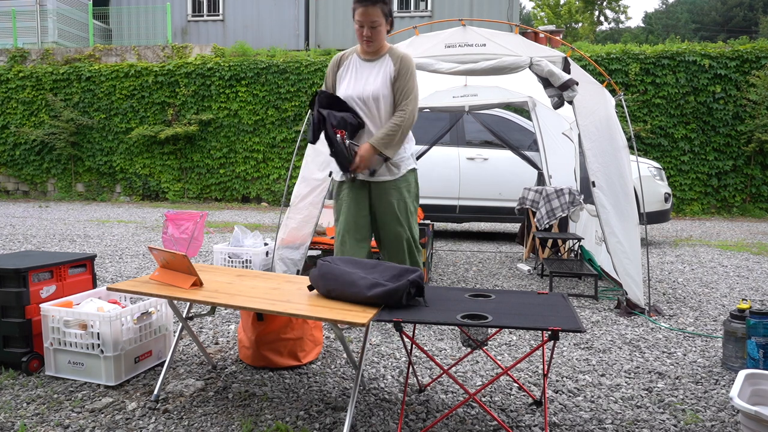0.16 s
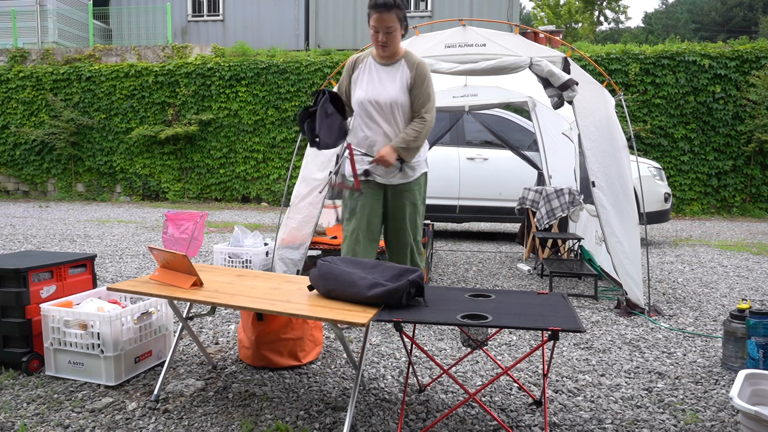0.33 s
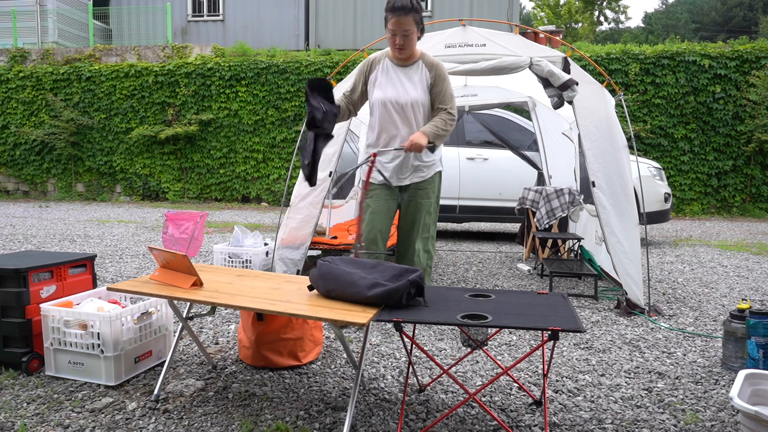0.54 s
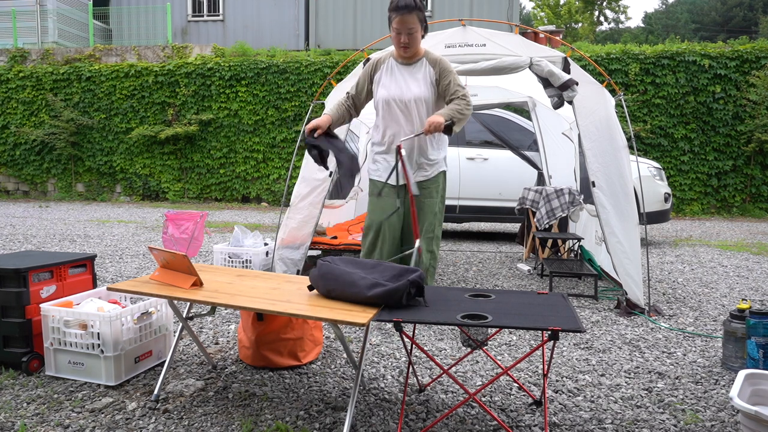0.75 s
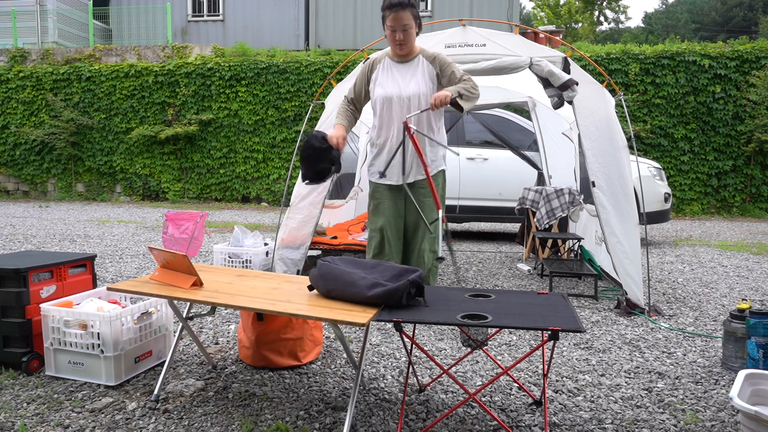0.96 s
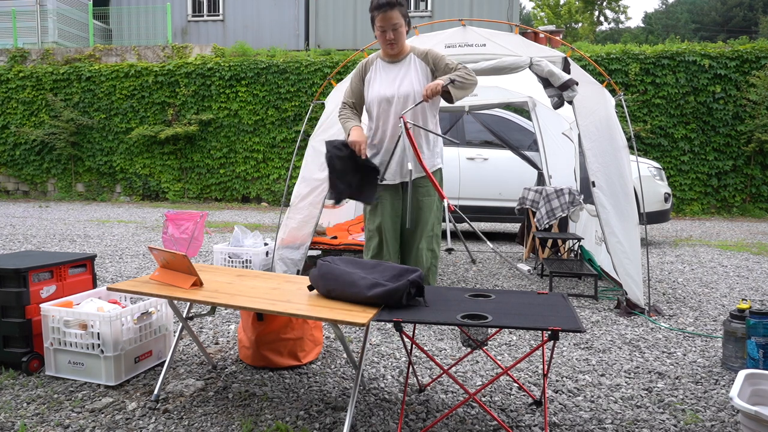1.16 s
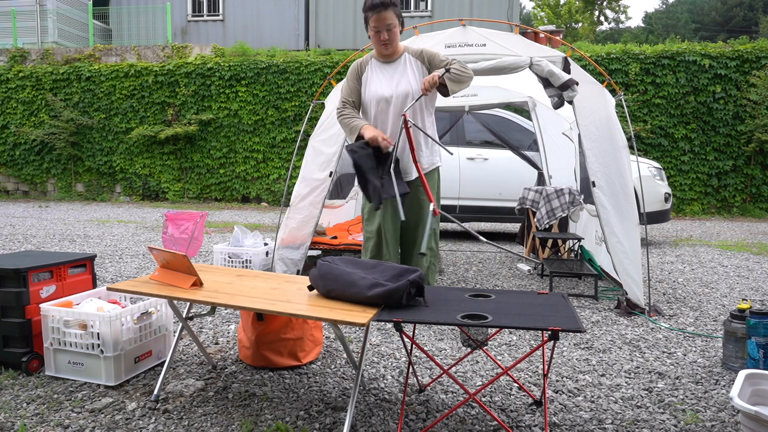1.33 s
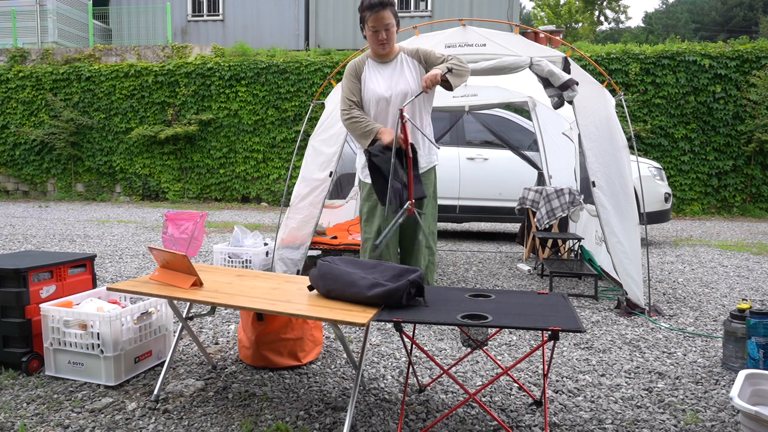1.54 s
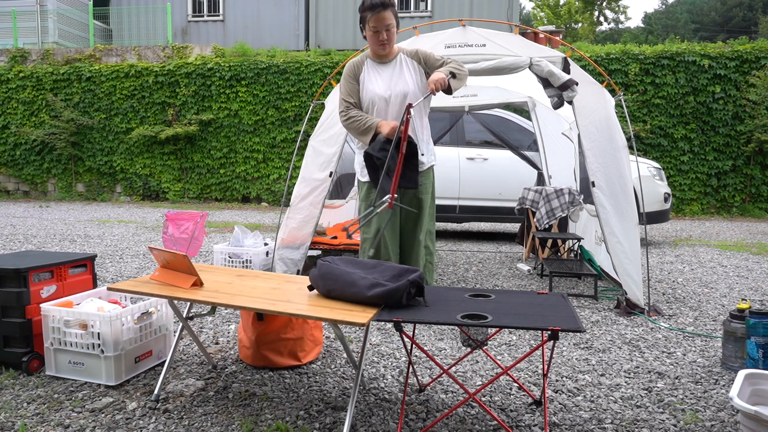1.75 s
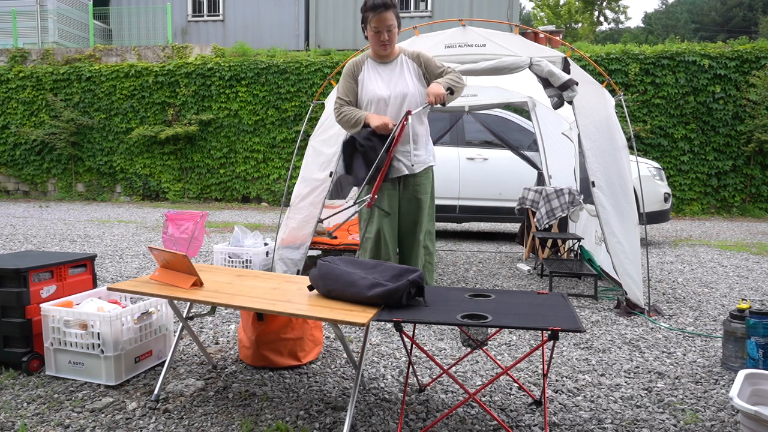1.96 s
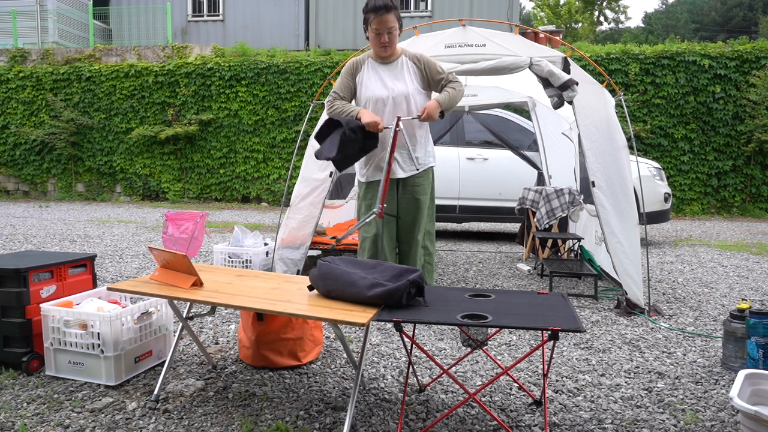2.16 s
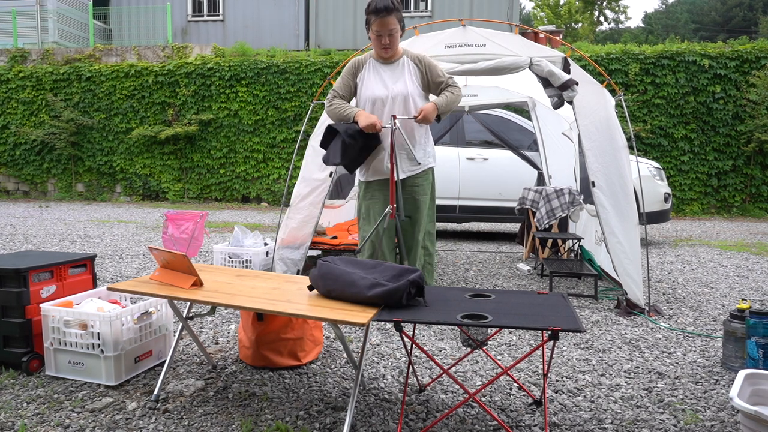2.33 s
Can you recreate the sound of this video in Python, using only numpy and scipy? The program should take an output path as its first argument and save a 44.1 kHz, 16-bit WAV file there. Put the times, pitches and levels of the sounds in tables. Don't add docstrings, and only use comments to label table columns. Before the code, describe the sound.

Thin metal tubes of a folding stand rattle out of a cloth bag and snap together outdoors

```python
import sys
import numpy as np
from scipy import signal
from scipy.fft import rfft, irfft
from scipy.io import wavfile
from scipy.ndimage import uniform_filter1d

SR = 44100
rng = np.random.default_rng(int(sys.argv[2]) if len(sys.argv) > 2 else 0)


def invert_db(level):
    return 10 ** (np.asarray(level, dtype=float) / 20)


def wav_out(sig):
    wavfile.write(sys.argv[1], SR, np.round(np.clip(np.atleast_2d(sig).T, -1, 1) * 32767).astype(np.int16))


N = 105840


def evened(x):
    return x / np.sqrt(np.mean(x ** 2) + 1e-20)


def read(points, hz):
    f, value = np.transpose(points)
    return np.interp(np.log(hz + 1), np.log(f + 1), value)


def add(mix, start_s, sound):
    part = mix[:, round(start_s * SR):][:, :sound.shape[1]]
    part += sound[:, :part.shape[1]]


def panned(pan_db):
    return invert_db(np.array([[pan_db / 2], [-pan_db / 2]]))


def colour(db):
    log = np.log(invert_db(np.maximum(np.r_[db, db[-2:0:-1]], -100)))
    return np.fft.ifft(np.exp(log - 1j * signal.hilbert(log).imag)).real[:512]


def grains(shape, per_s, spread_db):
    hits = rng.standard_normal(shape) * (rng.random(shape) < per_s / SR)
    hits *= invert_db(spread_db * np.minimum(rng.exponential(1, shape), 4))
    same = 0.8
    right = same * hits[0] + np.sqrt(1 - same ** 2) * hits[1]
    return evened(np.array([hits[0], right]))


def wash():
    # pitch_hz, density_db
    road = [(12, -88), (20, -43), (319, -15.5), (513, -10), (802, -3.5), (1760, -10), (3530, -21),
            (3840, -17.5), (12000, -23.5), (16000, -32)]
    # pitch_hz, likeness (0-1)
    likeness = [(30, .6), (100, .88), (300, .85), (950, .5), (4000, .1)]
    level_db, patch_db = -50, 1.86
    frames, hz = N // 256 + 5, np.fft.rfftfreq(1024, 1 / SR)
    a, b, c, d, patches = rng.standard_normal((frames, 513, 5)).T
    patches = evened(uniform_filter1d(uniform_filter1d(patches, 12, 0), 12, 1))
    same = np.clip(read(likeness, hz), -1, 1)[:, None]
    left = a + 1j * b
    right = same * left + np.sqrt(1 - same ** 2) * (c + 1j * d)
    z = np.array([left, right]) * invert_db(read(road, hz)[:, None] + patch_db * patches)
    return invert_db(level_db) * evened(signal.istft(z, nperseg=1024, noverlap=768)[1][:, :N])


def bird():
    # time_s, pitch_hz, level_db
    whistle = [
        (2.22, 3350, -70),
        (2.26, 3440, -65),
        (2.3, 3490, -72),
        (2.33, 3540, -67),
        (2.355, 3600, -55),
        (2.385, 3600, -57),
    ]
    (s, hz, db), t = np.transpose(whistle), np.arange(N) / SR
    flutter = 1 + .6 * evened(uniform_filter1d(rng.standard_normal(N), 300))
    phase = 2 * np.pi * np.cumsum(np.interp(t, s, hz)) / SR
    return flutter * invert_db(np.interp(t, s, db + 0.5, -140, -140)) * np.sin(phase)


def yard(x):
    # pitch_hz, t60_s
    decay = [(1000, 0.061), (5000, 0.13), (15000, 0.23)]
    shared = 0.31
    taps = rng.standard_normal((2, 16384)) + shared * rng.standard_normal(16384)
    taps[:, :180] = 0
    hz, t, z = signal.stft(taps, SR, nperseg=128)
    tail = signal.istft(z * invert_db(-60 * t / read(decay, hz)[:, None]), SR, nperseg=128)[1]
    return signal.fftconvolve(x, tail / np.linalg.norm(tail[0]), axes=1)[:, :N]


def cloth():
    # start_s, length_s, level_db, brightness_db_per_octave
    strokes = [(-.04, .11, -44.5, 2), (0.088, 0.23, -39.5, 0.5), (0.301, 0.17, -37.5, 2),
               (0.648, 0.21, -41, 3), (0.809, 0.12, -43, 3), (1.056, 0.089, -47, 0.5),
               (1.361, 0.15, -49.5, 0), (1.551, 0.056, -37.5, 0.5), (1.628, 0.094, -42, 4.5),
               (1.667, 0.069, -46, -0.5), (1.712, 0.047, -43, 0.5), (1.759, 0.054, -50, 11),
               (1.845, 0.032, -53, -5), (1.86, 0.082, -49, -1), (1.923, 0.058, -51, -2),
               (2.011, 0.033, -55, 2), (2.158, 0.03, -54.5, 8), (2.288, 0.24, -59, -2.5)]
    # pitch_hz, density_db
    fabric = [(300, -46), (700, -8.5), (1800, 1.5), (5600, -4.5), (12000, -11.5), (16000, -25)]
    per_s, spread_db, trim_db, pan_db = 4500, 3.0, -1.5, -3
    out, hz, t = np.zeros((2, N)), np.fft.rfftfreq(1024, 1 / SR), np.arange(N) / SR
    fizz = grains((2, N), per_s, spread_db) * panned(pan_db)
    for s, length, db, tilt_db in strokes:
        now = (t > s) & (t < s + length)
        weave = colour(read(fabric, hz) + tilt_db * np.log2((hz + 200) / 4000))
        stroke = fizz[:, now] * np.sin(np.pi * (t[now] - s) / length) ** 0.9
        rustle = signal.fftconvolve(stroke, weave[None] / np.linalg.norm(weave), axes=1)
        add(out, max(s, 0), invert_db(db + trim_db) * rustle)
    return out


def hand_thuds():
    # start_s, level_db, pitch_hz
    thuds = [
        (0.505, -30, 572),
        (0.563, -33, 385),
        (0.803, -25.5, 933),
        (1.029, -25.5, 974),
    ]
    t60_s, rise_s = 0.017, 0.0021
    out, t = np.zeros((2, N)), np.arange(4000) / SR
    for s, db, hz in thuds:
        thud = invert_db(db - 60 * t / t60_s) * np.sin(2 * np.pi * hz * t) * np.minimum(t / rise_s, 1) ** 2
        add(out, s, np.ones((2, 1)) * thud)
    return out


def tube_ring(rings, t):
    damp_hz, ring = 130, 0
    for f, width, db in rings:
        near_hz = f * rng.uniform(.955, 1.045, (5, 1))
        cluster = np.exp(-np.pi * damp_hz * t) * np.sin(2 * np.pi * near_hz * t).sum(0)
        ring = ring + invert_db(db) * np.exp(-np.pi * width * t) * (np.sin(2 * np.pi * f * t) + cluster)
    return ring / np.linalg.norm(ring)


def blow(peak_db, chatter_s, knock_hz, rings, ring_db, bright_db, rise_s):
    # pitch_hz, density_db
    crack_spectrum = [(400, -23.5), (1100, -12), (2050, -1.5), (5200, -4), (9500, -7), (13000, -16),
                      (16000, -47)]
    contacts_per_s, spread_db, first_db, trim_db = 22000, 1.0, 4, -6.5
    knock_gain_db, knock_octaves, tilt_by_knock_db = 9.5, .19, 1.4
    t, hz = np.arange(4096) / SR, np.fft.rfftfreq(1024, 1 / SR)
    drive = grains((2, 4096), contacts_per_s, spread_db)
    drive[:, 3] += invert_db(first_db)
    drive *= np.exp(-t / max(chatter_s, 5e-4)) * (1 - np.exp(-t / max(rise_s, 2e-5)))
    tilt_db = bright_db + tilt_by_knock_db * np.log2(knock_hz / 5000)
    knock_db = knock_gain_db * np.exp(-(np.log2((hz + 1) / knock_hz) / knock_octaves) ** 2)
    crack = colour(read(crack_spectrum, hz) + knock_db + tilt_db * np.log2((hz + 200) / 5000))
    body = invert_db(ring_db) * tube_ring(rings, t)
    body[:512] += crack / np.linalg.norm(crack)
    sound = signal.fftconvolve(drive, body[None], axes=1)
    loudest = np.sqrt(uniform_filter1d((sound ** 2).mean(0), 88).max())
    return invert_db(peak_db + trim_db) * sound / loudest


def stand():
    bag = [(.036, -33, .002, 6950), (0.1185, -27.5, 0.0061, 1730), (.1218, -24, 0.0035, 4030),
           (0.1385, -22.5, 0.0018, 2070), (0.1868, -29, 0.0018, 1560), (0.1928, -23, 0.0027, 5000),
           (0.2205, -20.5, 0.0046, 1700), (0.236, -24.5, 0.0035, 2000), (0.2446, -19, 0.0026, 5040),
           (0.2565, -21, 0.004, 5700), (.263, -30.5, .008, 2800), (0.3245, -23, 0.0025, 2110),
           (0.333, -13, 0.0019, 2210), (0.3499, -17.5, 0.0011, 5650), (0.3756, -13.5, 0.0036, 4930),
           (0.4015, -16, 0.0021, 3300), (0.4032, -13.5, 0.0034, 1650)]
    bag_ring = [(2300, 80, -3), (3400, 97, -22), (5000, 810, 30)]
    bundle = [(0.463, -9.5, 0.0033, 2240), (0.4665, -8, 0.0033, 2030), (.4705, -21, 0.0046, 4200),
              (.4755, -17, 0.0045, 4100), (0.479, -8.5, 0.0068, 4300), (.4832, -24, 0.0025, 2000),
              (.4875, -36, .004, 2000), (0.5034, -20.5, 0.0056, 3120), (0.5175, -18, 0.0028, 1820),
              (0.525, -16, 0.003, 5800), (0.5296, -20, 0.0037, 4670), (.537, -25, 0.0073, 3150)]
    bundle_ring = [(2070, 45, 0), (4250, 80, 1.5), (5500, 120, -3), (9200, 100, -1.5), (12500, 80, -3)]
    slide = [(.5624, -11.5, 0.0034, 3100), (.57, -11.5, .005, 5650), (.5776, -6.5, 0.0059, 8700),
             (.579, -15.5, 0.0025, 5840), (.584, -23.5, 0.0077, 3160), (.589, -11, 0.015, 5930),
             (.598, -22, 0.0021, 2800), (.604, -12, 0.0084, 2470), (.611, -24, 0.018, 1850),
             (.618, -25, 0.0073, 5600), (.634, -16.5, 0.008, 1900)]
    slide_ring = [(5516, 45, 0), (8712, 70, -4), (9500, 90, -6), (11600, 200, -5)]
    leg_a = [
        (.6578, -7, 0.0016, 3920),
        (0.6591, -8, 0.0042, 6050),
        (0.6634, -7.5, 0.0032, 2630),
        (.673, -10.5, 0.0025, 6600),
        (0.6894, -24.5, 0.0054, 2150),
    ]
    leg_a_ring = [(2600, 60, -6), (6150, 60, -4), (9518, 24, -1.5), (10500, 80, -4)]
    leg_b = [
        (0.803, -8, 0.00053, 4350),
        (.805, -13.5, 0.0047, 1720),
    ]
    leg_b_ring = [(1500, 150, -6), (4000, 120, -3), (9990, 90, 0), (13000, 300, -1.5)]
    leg_c = [
        (0.9194, -14, 0.0035, 6330),
        (0.9449, -8.5, 0.0031, 4300),
        (.949, -16, 0.014, 5930),
        (1.0277, -19, 0.0047, 3470),
        (1.0315, -18.5, 0.0089, 4800),
    ]
    leg_c_ring = [(2440, 30, -36), (4300, 58, 10), (5740, 160, 14), (12200, 63, -4)]
    hub = [
        (1.3155, -41, 0.002, 4600),
        (1.3176, -7.5, 0.0024, 7340),
        (1.32, -17.5, 0.0016, 3900),
        (1.322, -34, 0.0073, 8600),
    ]
    hub_ring = [(2050, 200, -8), (3760, 150, -3), (6020, 160, -5), (6600, 150, -5), (7350, 150, 0),
                (8530, 290, -1), (11900, 250, -6)]
    leg_d = [
        (1.6018, -6.5, 0.0021, 14800),
        (1.604, -19, 0.016, 5540),
        (1.6065, -18.5, 0.0052, 2190),
        (1.615, -19.5, 0.0056, 1670),
    ]
    leg_d_ring = [(5650, 60, -1), (7870, 100, -3), (8600, 80, -3), (12000, 250, -2), (15450, 150, 7)]
    tap = [
        (1.762, -33, 0.0095, 2550),
        (1.773, -30, 0.0085, 3600),
        (1.795, -37, 0.011, 2470),
    ]
    tap_ring = [(2150, 54, 5.5), (2730, 58, 5.7), (3600, 55, 3.5), (4800, 87, 5.1)]
    leg_e = [
        (1.2112, -19, 0.0054, 4100),
        (1.214, -16, .003, 5300),
        (1.2172, -20, 0.0021, 2370),
    ]
    leg_e_ring = [(3800, 60, -1), (5670, 80, -4), (6190, 60, -6), (9650, 45, 0), (11100, 80, -7),
                  (12500, 100, -5)]
    pin = [
        (1.0024, -19.5, 0.0082, 7600),
        (1.5051, -13.5, 0.0019, 7300),
        (1.51, -30, 0.0033, 7560),
    ]
    pin_ring = [(4140, 150, 1), (5230, 110, 1), (7700, 250, 0), (8600, 130, -5), (10700, 130, -8),
                (12300, 130, -9)]
    leg_d_ticks = [
        (1.5567, -22.5, 0.0084, 1970),
        (1.5616, -36, 0.002, 6500),
        (1.5685, -25, 0.0049, 2330),
        (1.5737, -21.5, 0.0011, 6600),
        (1.5875, -38, 0.0016, 3500),
    ]
    leg_d_ticks_ring = [(2000, 330, 0), (3600, 430, -1.8), (6500, 520, -2.3)]
    # ring_against_crack_db, left_right_db, brightness_db_per_octave, rise_s
    parts = [(-18, -3, 0, 0.00088), (-10.5, -3, 4, 0.00091), (-2.5, -4, 1.6, 0.00017),
             (-7, -3.5, 3.6, 0.00019), (-3, -7.5, 3, 0.00016), (-10, -6, 3, 0.00017),
             (-9, -4.5, 2, 0.00049), (-7.5, -5.5, 7, 0.0002), (1, -4.5, -0.5, 0.002), (-2, -5, .5, 0.00033),
             (-3.5, -6, 6.5, 0.00014), (-2.5, -5, 2.5, 0.00013)]
    tables = [(bag, bag_ring), (bundle, bundle_ring), (slide, slide_ring), (leg_a, leg_a_ring),
              (leg_b, leg_b_ring), (leg_c, leg_c_ring), (hub, hub_ring), (leg_d, leg_d_ring),
              (tap, tap_ring), (leg_e, leg_e_ring), (pin, pin_ring), (leg_d_ticks, leg_d_ticks_ring)]
    out = np.zeros((2, N))
    for (blows, rings), (ring_db, pan_db, bright_db, rise_s) in zip(tables, parts):
        for s, peak_db, chatter_s, knock_hz in blows:
            sound = blow(peak_db, chatter_s, knock_hz, rings, ring_db, bright_db, rise_s)
            add(out, s, sound * panned(pan_db))
    low_cut = signal.butter(4, 650, "high", fs=SR, output="sos")
    return signal.sosfilt(low_cut, out)


def scene():
    yard_db = -5.5
    near = stand() + hand_thuds() + cloth()
    return near + invert_db(yard_db) * yard(near) + wash() + bird()


def top_cut(x):
    return signal.sosfilt(signal.butter(12, 17330, fs=SR, output="sos"), x)


def record(dry):
    # pitch_hz, left_lead_radians
    ports = [(100, 0.078), (1210, .14), (3450, 0.67), (8440, 0.82), (10300, 1), (13500, .65), (16900, 0)]
    ceiling, edge_hz = .8, 16150
    turn = np.exp(.5j * read(ports, np.fft.rfftfreq(N, 1 / SR)))
    soft = ceiling * np.tanh(dry / ceiling)
    pair = irfft(rfft(soft) * np.array([turn, 1 / turn]), N)
    band = signal.oaconvolve(pair, signal.firwin(255, edge_hz, fs=SR)[None], "same")
    return top_cut(band)


dry = scene()
out = record(dry)
wav_out(out)
```